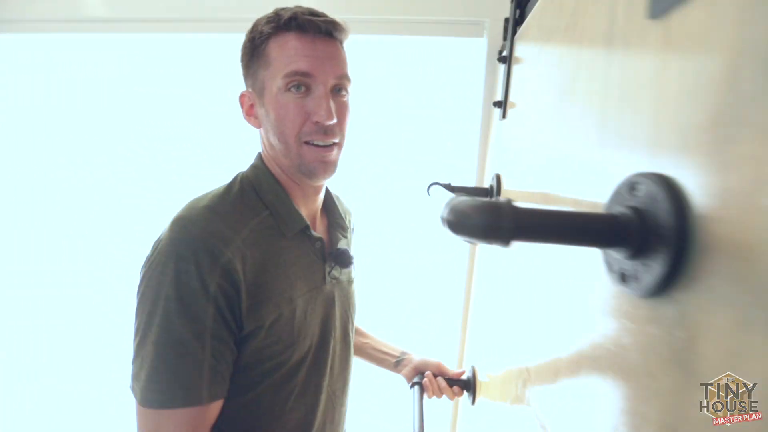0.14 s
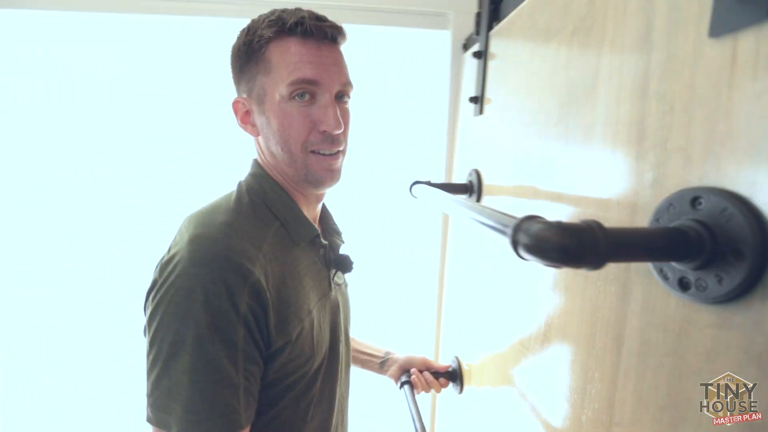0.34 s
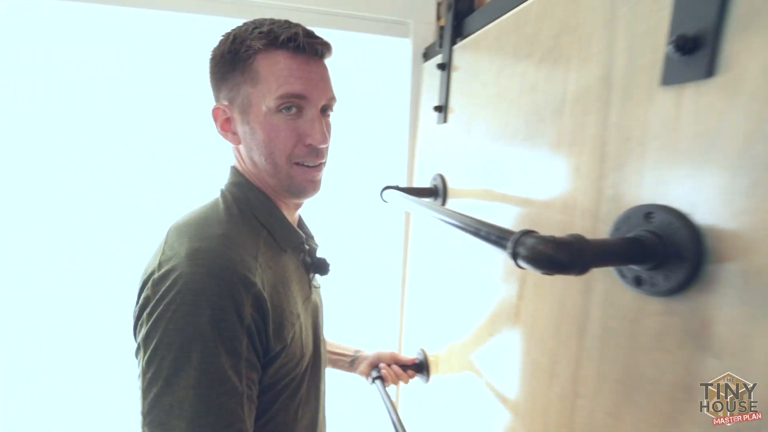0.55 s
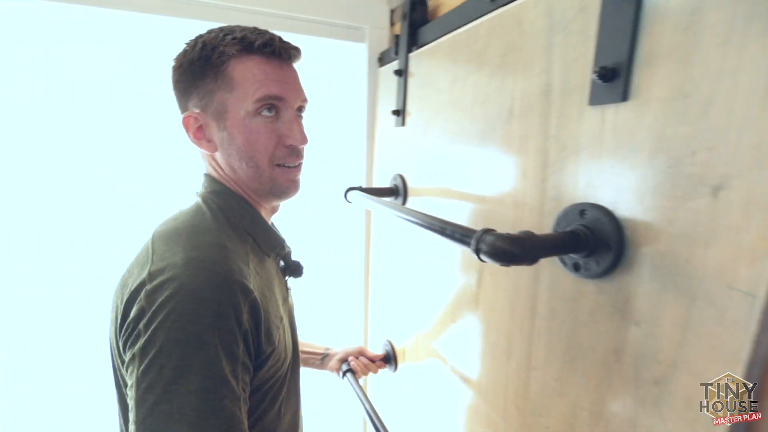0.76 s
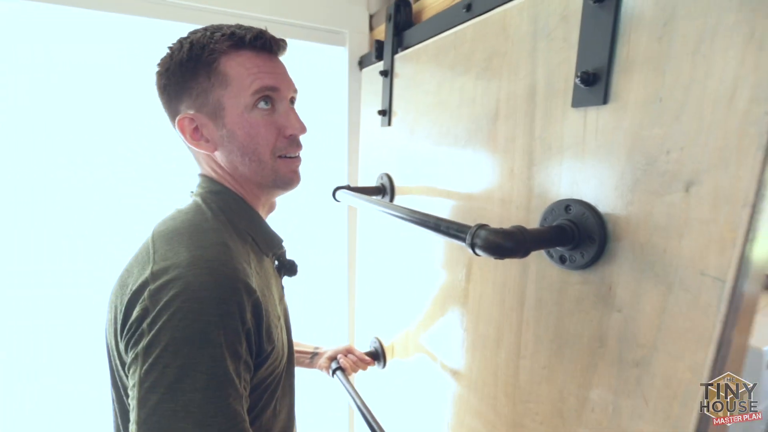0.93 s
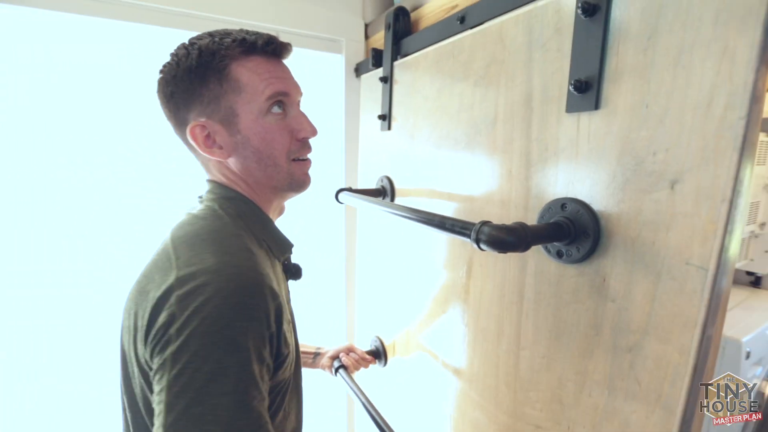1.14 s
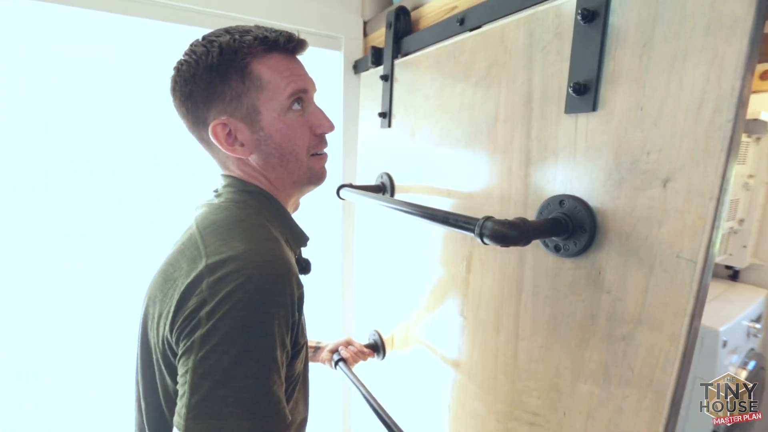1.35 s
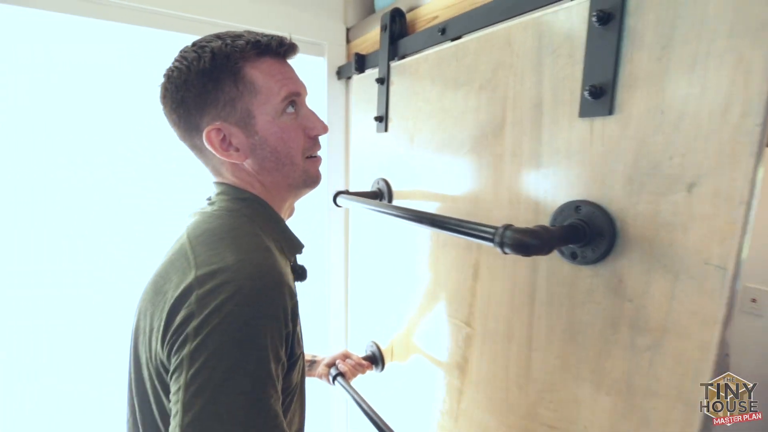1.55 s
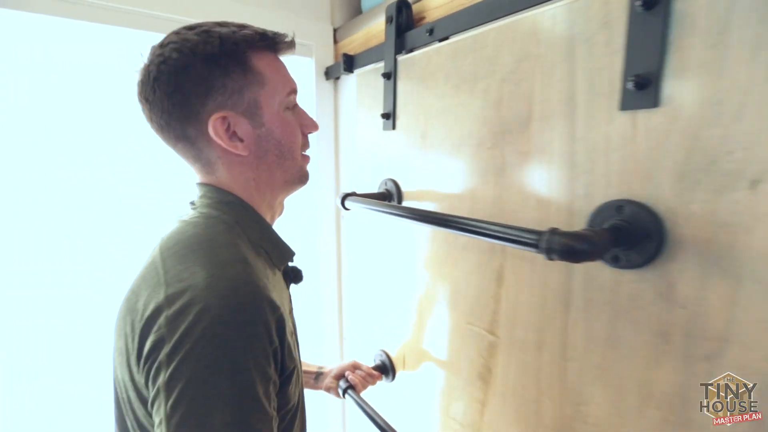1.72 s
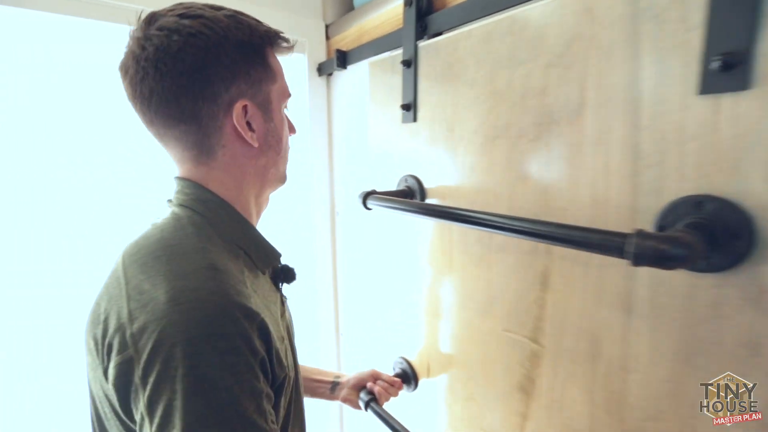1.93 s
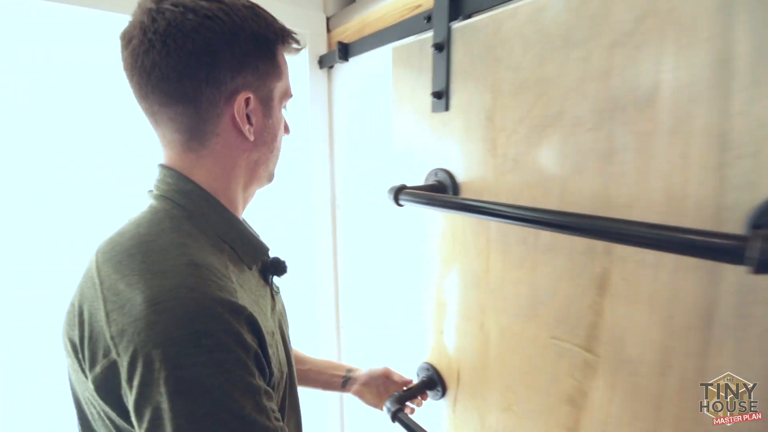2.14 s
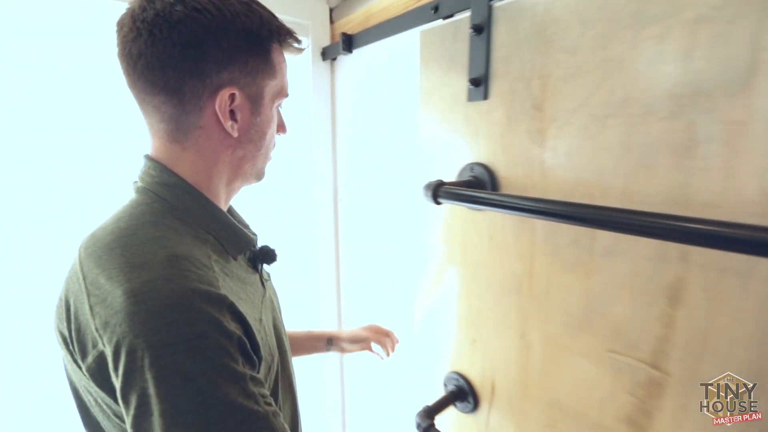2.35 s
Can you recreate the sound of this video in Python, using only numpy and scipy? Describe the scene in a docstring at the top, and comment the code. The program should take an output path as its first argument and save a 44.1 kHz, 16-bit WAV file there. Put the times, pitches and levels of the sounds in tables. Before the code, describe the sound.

Heavy wooden door on an overhead metal track: soft early knocks, a near-quiet pause, two firmer knocks, deepening wheel rumble, then a loud thud with metallic rattle and louder rolling, heard close in a small indoor room.

```python
"""Wooden barn door on a steel track

In a small house the door bumps and rattles on its hangers, rubs softly, knocks as the wheels get going,
rolls with a growing rumble, takes a heavy bump and rolls on while the steel fittings clink.
Hits sum damped modes, a noisy contact and a room tail; rolling, rubbing and floor are shaped noise;
groans are short wavering sines.
"""
import sys
import numpy as np
from scipy import signal
from scipy.fft import rfft, irfft, next_fast_len
from scipy.io import wavfile
from scipy.ndimage import map_coordinates

SR = 44100
rng = np.random.default_rng(int(sys.argv[2]) if len(sys.argv) > 2 else 0)


def to_wav(sig):
    """Store sig (one row per channel, or 1-D mono) as 16-bit WAV at the path in sys.argv[1].

    Samples outside -1..1 are clipped; the rate is SR.
    """
    pcm = np.clip(np.atleast_2d(sig), -1, 1) * 32767
    pcm = np.round(pcm).astype(np.int16)
    wavfile.write(sys.argv[1], SR, pcm.T)  # frames by channels


N = 105310

# knocks of the door: t/s, level/dB, low-pass f/Hz, high-pass f/Hz
KNOCKS = [(0.079, -59, 2450, 500), (0.117, -49, 1750, 556), (0.324, -57, 1030, 120),
          (0.413, -38, 1360, 200), (0.443, -31, 1510, 84), (0.474, -33, 1520, 170), (0.483, -31, 1990, 480),
          (0.508, -31, 730, 199), (.982, -42, 2110, 240), (1.115, -50.5, 1130, 380),
          (1.492, -34.5, 1640, 250), (1.4977, -26, 1146, 373), (1.604, -34.5, 1350, 295),
          (2.1339, -24, 1190, 380), (2.146, -24.5, 1700, 249), (2.155, -16.5, 1640, 273),
          (2.166, -20.5, 940, 110), (2.293, -35, 1530, 550)]
# nominal modes of the wooden panel: f/Hz, level/dB, t60/s
PANEL_MODES = [(220.7, 4.5, 0.24), (256.4, 1.5, 0.14), (383.3, -6, 0.13), (475.9, -2, 0.26),
               (632.6, -2, 0.17), (752, -1, 0.14), (893, 0.5, 0.066), (1153, -10, 0.05),
               (1512, -7.5, 0.075)]
# spectrum of wood contact and its room tail: f/Hz, level/dB
THUD_SPECTRUM = [(30, -11.5), (120, 5.5), (250, 4.5), (500, -1.5), (950, -6), (1700, -17.5), (3000, -21),
                 (8000, -5.5)]
# decay of the room: f/Hz, t60/s
ROOM_DECAY = [(50, 0.3), (200, 0.3), (500, 0.21), (1000, .2), (2500, 0.16), (9000, 0.25)]
# rolling: t/s, level/dB, treble edge f/Hz
ROLL = [(0, -72, 589), (.27, -92.5, 577), (.36, -58, 400), (.68, -59, 400), (.74, -83, 527),
        (.93, -55.5, 702), (1.08, -57, 918), (1.29, -83, 700), (1.35, -58.5, 477), (1.42, -67.5, 773),
        (1.48, -47, 1296), (1.58, -43, 518), (1.68, -41, 556), (1.89, -45.5, 1023), (1.95, -42, 996),
        (2.12, -45.5, 1007), (2.39, -37.5, 2080)]
# spectrum of the rolling wheels: f/Hz, level/dB
WHEEL_SPECTRUM = [(25, -20.5), (65, -9), (115, -0.5), (190, -0.5), (330, 1), (560, -6.5), (1100, -6.5),
                  (1700, -18.5)]
# steady resonances of the rolling door: f/Hz, width/Hz, lift/dB
WHEEL_PEAKS = [(115, 17, 4.5), (250, 27, 4), (717, 65, 9.5)]
# jolts that ring the track: t/s, level/dB
JOLTS = [(1.606, -24.5)]
# modes of the track, the close pair beats: f/Hz, nominal level/dB, t60/s
TRACK_MODES = [(541, -1, 0.13), (477, -0.5, 0.098), (534, -20, 0.94)]
# clinks of the steel fittings: t/s, level/dB, low-pass f/Hz, rattle t60/s
CLINKS = [(0.4792, -48, 4270, 0.02), (0.981, -52.5, 8700, 0.013), (1.495, -53.5, 3550, 0.08),
          (1.620, -57.5, 2860, 0.062), (2.155, -36.5, 5600, 0.052), (2.206, -38, 6020, 0.26),
          (2.289, -42, 4300, 0.18)]
# nominal modes of the fittings: f/Hz, level/dB, t60/s
FITTING_MODES = [(1560, 2, 0.092), (2768, -2, 0.055), (4680, 1.5, 0.026)]
# spectrum of steel contact and its room tail: f/Hz, level/dB
CRACK_SPECTRUM = [(300, -27), (1300, 11.5), (2200, 3), (2900, -5), (3600, -5), (4800, -13), (5400, -13),
                  (11000, -12)]
# heavy shoves that shake the wall: t/s, level/dB
SHOVES = [(.492, -49), (1.615, -44.5), (2.138, -27), (2.17, -23)]
# nominal modes of the wall: f/Hz, level/dB, t60/s
WALL_MODES = [(51.7, -10, 0.64), (94.9, -9.5, 0.36), (138.4, 1.5, 0.3)]
# groans and hums of the moving panel: t/s, level/dB, length/s, centre f/Hz
GROANS = [(0.131, -55.5, 0.048, 657), (0.313, -51, 0.036, 187), (0.578, -48.5, 0.055, 252),
          (.755, -52, 0.096, 236.4), (1.0, -52.5, 0.13, 215.8), (1.508, -40.5, 0.074, 213.2),
          (1.958, -46, 0.18, 117)]
# soft dry rubbing: t/s, level/dB
RUB = [(.1, -77), (.3, -93.5), (.6, -65.5), (.8, -64.5), (1.05, -74), (1.25, -90.5), (1.52, -70.5),
       (1.68, -92.5)]
# spectrum of the rubbing: f/Hz, level/dB
RUB_SPECTRUM = [(200, -26.5), (900, 5.5), (2700, 5.5), (7000, -0.5), (12000, -23)]
# light scraping as the wheels creep: t/s, level/dB
SCRAPE = [(.74, -96), (.92, -64), (1.11, -68), (1.23, -83.5), (1.47, -69.5), (1.6, -88.5)]
# spectrum of the quiet room: f/Hz, level/dB
FLOOR_SPECTRUM = [(25, 3), (250, -9.5), (1200, -21.5), (9500, -33.5), (11200, -29.5), (12500, -37.5)]

PANEL_DB, CONTACT_DB, KNOCK_ROOM_DB = -5.5, 1.5, 2
CONTACT_T60_S, ROOM_RISE_S = 0.065, 0.0035
GRAINS_PER_S, GRAIN_DB = 380, -7.5
SWELLS_PER_S, SWELL_DB = 26, 0.42  # uneven track
BASS_EDGE_AT_0_DB_HZ, BASS_DB_PER_OCTAVE, BASS_EDGE_MAX_HZ = 6.6, 14, 190
TRACK_RISE_S, WALL_RISE_S = 0.004, 0.0075
FITTING_DB, CLINK_ROOM_DB = -9.5, -5
CHATTER_PER_S, CHATTER_DB = 400, 3
RATTLE_RISE_SHARE = 0.012  # of the rattle's t60
WAVERS_PER_S, WAVER_SHARE = 130, 0.038
SCRAPE_LOW_HZ, SCRAPE_HIGH_HZ = 730, 2500
FLOOR_DB, TOP_HZ = -73.5, 12500


def knocks():
    """Struck wood: panel modes, contact and room; each knock has its own treble and bass edge."""
    out = np.zeros(N)
    for s, db, top_hz, low_hz in KNOCKS:
        hit = amp(PANEL_DB) * ring(PANEL_MODES)
        hit += amp(CONTACT_DB) * contact(THUD_SPECTRUM, CONTACT_T60_S)
        hit += amp(KNOCK_ROOM_DB) * room(THUD_SPECTRUM)
        hit = cut(hit, top_hz, "low", order=4)
        hit = cut(hit, low_hz, "high")
        add(out, s, amp(db) * burst(hit))
    return out


def rolling():
    """Wheels on rough track excite steady resonances; louder rolling reaches deeper."""
    level_db, top_hz = curves(ROLL)
    bumps = (rng.random(N) < GRAINS_PER_S / SR) * rng.standard_normal(N)
    rough = rng.standard_normal(N) + amp(GRAIN_DB) * unit(bumps)
    hz, t, z = signal.stft(rough, SR, nperseg=2048, noverlap=1792)

    body_db = along(WHEEL_SPECTRUM, hz)
    for centre_hz, width_hz, lift_db in WHEEL_PEAKS:
        body_db = body_db + lift_db / (1 + (2 * (hz - centre_hz) / width_hz) ** 2)

    frame_top_hz = np.interp(t * SR, np.arange(N), top_hz)
    frame_db = np.interp(t * SR, np.arange(N), level_db)
    bottom_hz = BASS_EDGE_AT_0_DB_HZ * 2 ** (-frame_db / BASS_DB_PER_OCTAVE)
    bottom_hz = np.minimum(bottom_hz, BASS_EDGE_MAX_HZ)
    f = hz[:, None] + 1  # avoids division by zero
    treble_loss = 1 + (f / frame_top_hz) ** 7
    bass_loss = 1 + (bottom_hz / f) ** 6
    gain = amp(body_db)[:, None] / np.sqrt(treble_loss * bass_loss)
    gain /= np.linalg.norm(gain, axis=0)  # edges leave the level alone
    rumble = signal.istft(z * gain, SR, nperseg=2048, noverlap=1792)[1][:N]
    return amp(level_db + SWELL_DB * wobble(SWELLS_PER_S, N)) * unit(rumble)


def steel():
    """Track rings when jolted, loose fittings chatter; longer rattles start more softly."""
    out, t = np.zeros(N), np.arange(SR) / SR
    track_rise = 1 - np.exp(-(t / TRACK_RISE_S) ** 2)
    for s, db in JOLTS:
        add(out, s, amp(db) * track_rise * ring(TRACK_MODES, detune=0))
    for s, db, top_hz, t60 in CLINKS:
        flutter = amp(CHATTER_DB * wobble(CHATTER_PER_S, SR))
        hit = burst(contact(CRACK_SPECTRUM, t60) * flutter)
        hit += amp(FITTING_DB) * ring(FITTING_MODES)
        hit += amp(CLINK_ROOM_DB) * room(CRACK_SPECTRUM)
        rise = 1 - np.exp(-t / (RATTLE_RISE_SHARE * t60))
        add(out, s, amp(db) * cut(hit * rise, top_hz, "low", order=3))
    return out


def panel():
    """Shoves boom through the wall's damped modes; the panel groans in sines of wavering pitch."""
    out = np.zeros(N)
    rise = 1 - np.exp(-(np.arange(SR) / SR / WALL_RISE_S) ** 2)
    for s, db in SHOVES:
        add(out, s, amp(db) * rise * ring(WALL_MODES))
    for s, db, length_s, hz in GROANS:
        shape = swell(length_s)
        pitch_hz = hz * (1 + WAVER_SHARE * wobble(WAVERS_PER_S, len(shape)))
        tone = unit(np.sin(2 * np.pi * np.cumsum(pitch_hz) / SR))
        add(out, s, amp(db) * shape * tone)
    return out


def rubbing():
    """Friction noise of the sliding door: a faint dry swish and a band-limited scrape."""
    swish = noise(RUB_SPECTRUM, N)
    scrape = cut(rng.standard_normal(N), SCRAPE_LOW_HZ, "high")
    scrape = cut(scrape, SCRAPE_HIGH_HZ, "low", order=8)
    return amp(curves(RUB)[0]) * swish + amp(curves(SCRAPE)[0]) * unit(scrape)


def room_floor():
    """Steady coloured noise of the quiet room."""
    return amp(FLOOR_DB) * noise(FLOOR_SPECTRUM, N)


def ring(modes, detune=.012):
    """One second of damped modes, level and (unless detune is 0) pitch varied at random per strike."""
    t = np.arange(SR) / SR
    chance = rng.standard_normal((len(modes), 2))
    total = np.zeros(SR)
    for k, (hz, db, t60) in enumerate(modes):
        decay = amp(db + chance[k, 0] - 60 * t / t60)
        mode_hz = hz * (1 + detune * chance[k, 1])
        total += (-1) ** k * decay * np.sin(2 * np.pi * mode_hz * t)
    return burst(total)


def contact(colour, t60):
    """Noisy core of a hit, decaying exponentially."""
    return burst(noise(colour, SR) * amp(-60 * np.arange(SR) / SR / t60))


def room(colour):
    """Small room's answer to a hit, each band dying at its own speed."""
    hz, t, z = signal.stft(noise(colour, SR), SR, nperseg=256)
    decay = amp(-60 * t / along(ROOM_DECAY, hz)[:, None])
    tail = signal.istft(z * decay, SR, nperseg=256)[1][:SR]
    return burst(tail * (1 - np.exp(-np.arange(SR) / SR / ROOM_RISE_S)))


def swell(length_s):
    """Half-sine rise and fall."""
    return np.sin(np.linspace(0, np.pi, int(length_s * SR)))


def wobble(rate, size):
    """Smooth random curve, rate knots a second."""
    knots = rng.standard_normal(int(size * rate / SR) + 2)
    return map_coordinates(knots, [np.arange(size) * rate / SR], mode="nearest")


def noise(colour, size):
    """Coloured noise of rms 1."""
    return unit(filtered(rng.standard_normal(size), lambda hz: amp(along(colour, hz))))


def filtered(x, response):
    """x times a response of frequency."""
    m = next_fast_len(len(x) + SR // 4)
    return irfft(rfft(x, m) * response(np.fft.rfftfreq(m, 1 / SR)), m)[:len(x)]


def cut(x, hz, kind, order=2):
    """Causal Butterworth low- or high-pass."""
    sos = signal.butter(order, min(hz, SR * .45), kind, fs=SR, output="sos")
    return signal.sosfilt(sos, x)


def along(points, hz):
    """Interpolate (f/Hz, value) points on a log frequency axis."""
    f, v = np.transpose(points)
    return np.interp(np.log(hz + 1), np.log(f + 1), v)


def curves(rows):
    """One value per sample for each column after the time."""
    s, *cols = np.transpose(rows)
    return [np.interp(np.arange(N) / SR, s, c) for c in cols]


def add(track, s, x):
    """Mix x into the track at time s."""
    part = track[max(round(s * SR), 0):][:len(x)]
    part += x[:len(part)]


def amp(db):
    """Decibels to gain."""
    return 10 ** (np.asarray(db) / 20)


def unit(x):
    """Scale to rms 1."""
    return x / np.sqrt(np.mean(x ** 2) + 1e-20)


def burst(x):
    """Scale to the energy of 20 ms at rms 1."""
    return x * np.sqrt(SR / 50 / np.sum(x ** 2))


def scene():
    """All parts of the door over the quiet of the room."""
    door = knocks() + rolling() + steel() + panel() + rubbing()
    return (door + room_floor())[None]


def record(dry):
    """Remove everything from the band limit up."""
    return filtered(dry[0], lambda hz: hz < TOP_HZ)[None]


dry = scene()
out = record(dry)
to_wav(out)
```